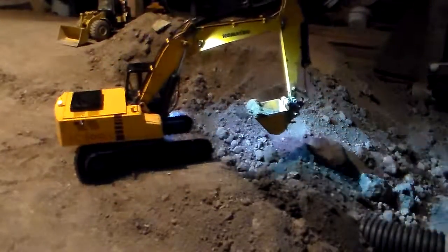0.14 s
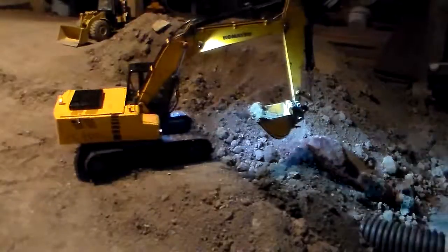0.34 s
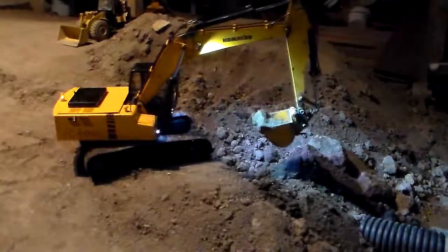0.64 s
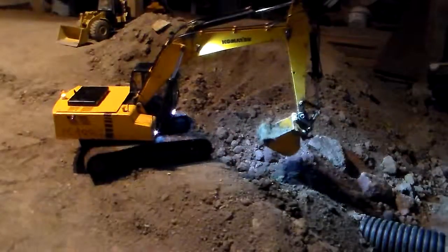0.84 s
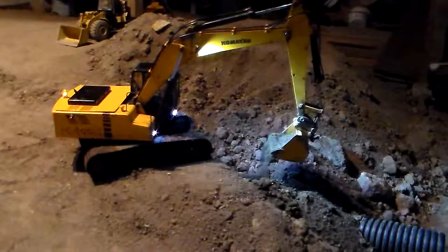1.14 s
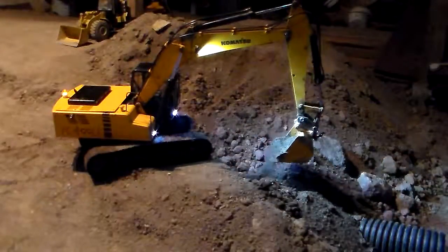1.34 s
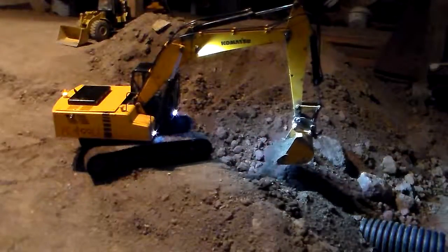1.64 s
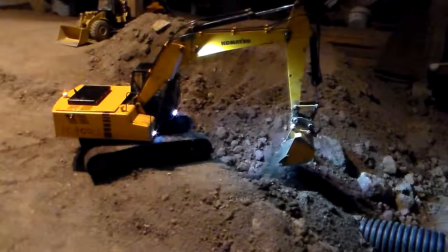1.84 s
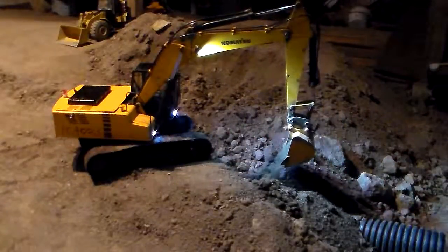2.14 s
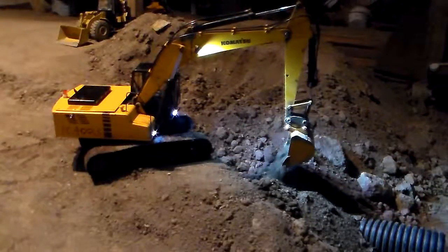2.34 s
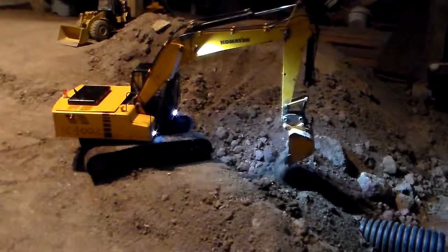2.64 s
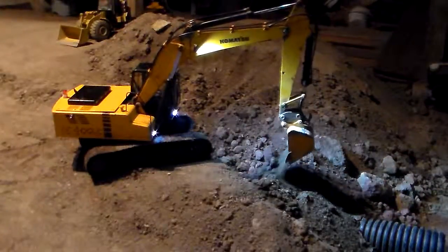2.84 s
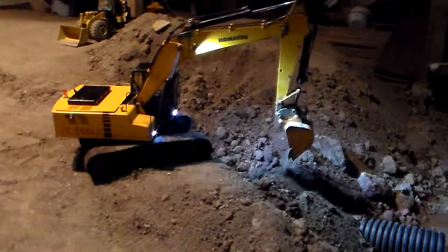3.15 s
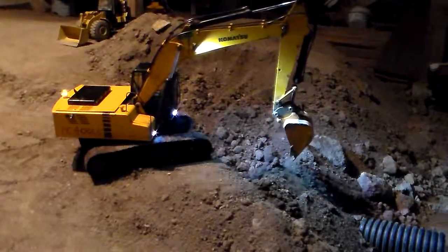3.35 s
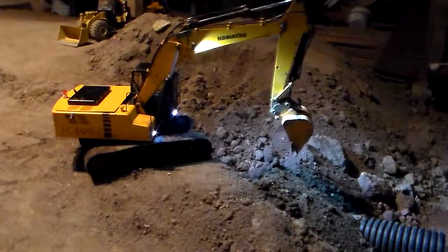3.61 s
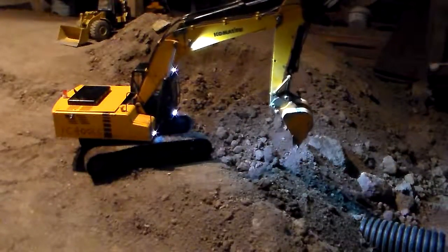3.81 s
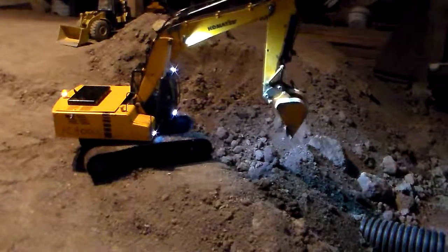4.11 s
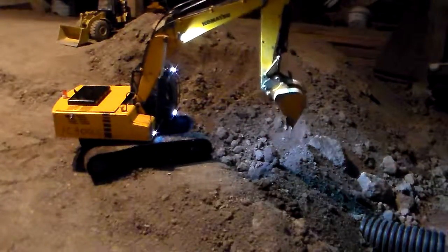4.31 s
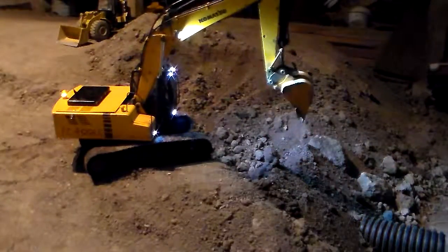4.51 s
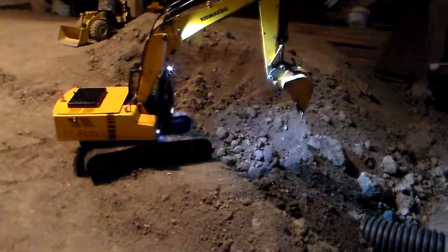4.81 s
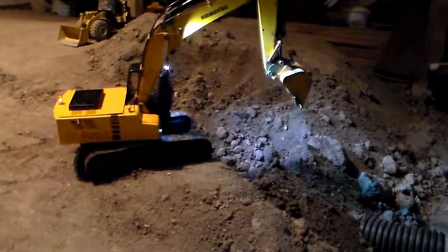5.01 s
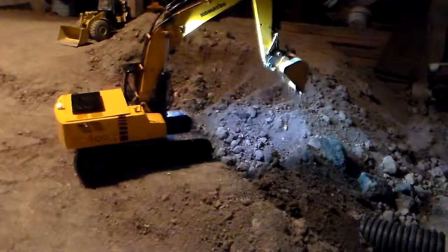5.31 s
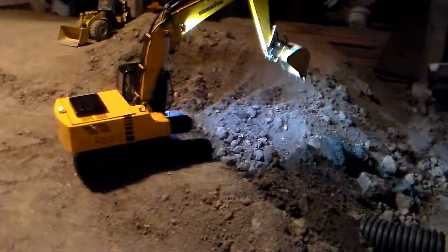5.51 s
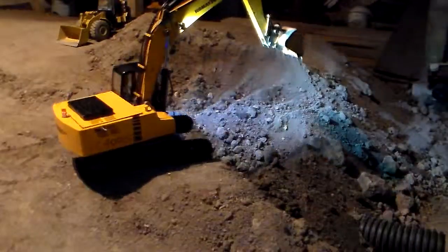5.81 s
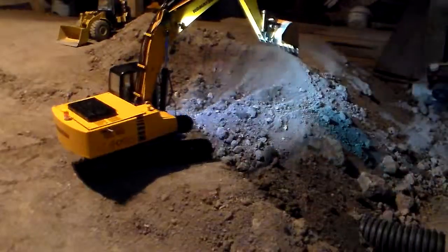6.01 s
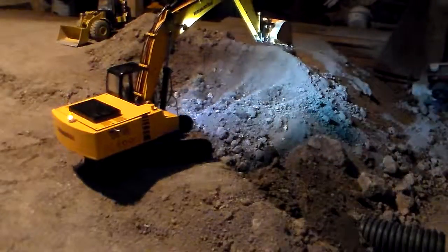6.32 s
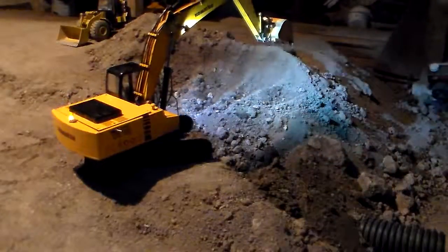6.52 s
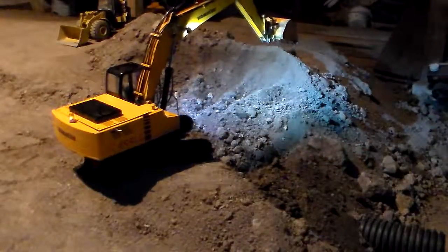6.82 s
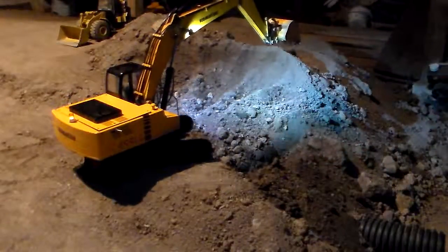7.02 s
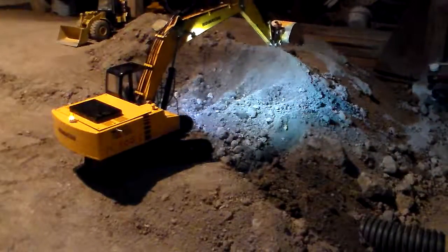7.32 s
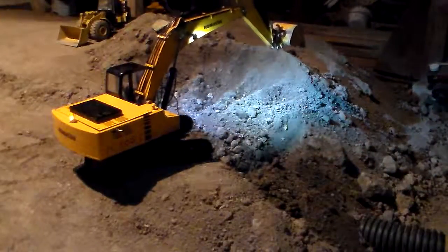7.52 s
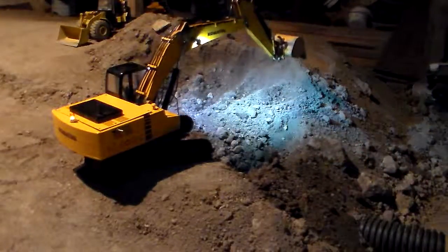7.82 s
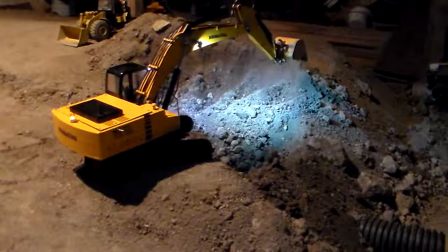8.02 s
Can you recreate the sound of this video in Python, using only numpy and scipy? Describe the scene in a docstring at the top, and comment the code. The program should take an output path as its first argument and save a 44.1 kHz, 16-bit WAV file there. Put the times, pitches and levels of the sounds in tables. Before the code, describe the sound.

The wavering whine of a miniature excavator's pump fills a quiet workshop, joined by short soil hisses and later a light rattle.

```python
"""A model digger's hydraulic gear pump, driven by a brushless motor, hums in a quiet workshop.
Its tones are orders (multiples) of the shaft speed, which hunts about each new load the valves set;
they and the rush of oil force the housing to resonate. The turning rotor modulates the speed
controller's chopping whine into side tones. The body swings twice, the second time turning a rattling
side to the listener. Behind are a tick, hisses like dry soil off the bucket, a low hum and room rumble."""
import sys
import numpy as np
from scipy import signal
from scipy.fft import rfft, irfft, next_fast_len
from scipy.io import wavfile
from scipy.ndimage import uniform_filter1d

SR = 44100
rng = np.random.default_rng(int(sys.argv[2]) if len(sys.argv) > 2 else 0)


def transcribe(signal):
    """Save signal, clipped to [-1, 1], as a 16-bit WAV file at the path in sys.argv[1]."""
    frames = np.atleast_2d(signal).T
    limited = np.clip(frames, -1, 1)
    pcm = np.round(limited * 32767).astype(np.int16)
    wavfile.write(sys.argv[1], SR, pcm)


N = 359415
CONTROL_HZ, CRUISE_HZ = 400, 54  # rate of the slow control curves; usual shaft speed
TIME, STEPS = np.arange(N) / SR, np.arange(3400) / CONTROL_HZ


# Neighbouring high orders that take turns at ringing the housing: order, relative_db
HIGH_ORDERS = [(46, -8), (47, 2), (48, -6.5), (49, 4), (50, -35), (51, 0)]
# Weaker pump tones: order, relative_db
WEAK_ORDERS = [(7, -24), (8.5, -22), (9, -19), (10, -16), (10.5, -11.5), (11, -11.5), (13, -15),
               (14.5, -13), (15.5, -8.5), (18, -7.5), (20, -6), (24.5, -5.5), (56, -13)]
def gear_pump(turns, load_hz, main_db, second_db, high_db, housing_db, turned):
    """Forced vibration: shaft orders swell near a housing resonance and sink between two."""
    steep = lambda hz: resonance(hz) ** 1.6
    ring = lambda x, window_s: steadied(filtered(x, steep), window_s)
    octave_db = -47 - 2.5 * (load_hz - CRUISE_HZ) + 3.5 * turned
    overspeed_db = -5 * np.maximum(load_hz - 55.8, 0)
    out = amp(main_db) * ring(shaft_tone(turns, order=21, flutter_db=2), window_s=1 * .76)
    out += amp(second_db) * ring(shaft_tone(turns, order=18.5, flutter_db=3), window_s=1)
    out += amp(octave_db) * ring(shaft_tone(turns, order=42, flutter_db=3.5), window_s=.18)
    high = sum(amp(db) * shaft_tone(turns, order, flutter_db=1) for order, db in HIGH_ORDERS)
    out += amp(high_db + overspeed_db) * ring(high, window_s=.23)
    low_db = 2.3 * (main_db + 27) - 62  # grows with the main tone
    out += amp(low_db) * shaft_tone(turns, order=5, flutter_db=2)
    weak = sum(amp(db + (3.5 if order > 16 else -1) * turned) * shaft_tone(turns, order, flutter_db=3)
               for order, db in WEAK_ORDERS)
    return out + amp(housing_db - 7) * filtered(weak, resonance)


def shaft_tone(turns, order, flutter_db):
    """Rotational harmonic: a multiple of shaft speed, wandering in level and left-right phase."""
    phase = 2 * np.pi * (order * turns + rng.random())
    lead = upsample(.0039 * order * drift(1.05))
    flutter = upsample(amp(flutter_db * drift(26.5)))
    return np.sqrt(2) * flutter * np.cos([phase + lead, phase - lead])


# Loads set by the valve moves: start_s, shaft_speed_hz
VALVE_MOVES = [(0.0, 51.0), (.2, 50.1), (.46, 51.3), (.78, 53.3), (.89, 51.2), (1.17, 53.8), (1.86, 51.8),
               (1.96, 54.4), (2.3, 53.5), (2.78, 54.2), (3.13, 55.3), (3.38, 53.5), (3.72, 52.1),
               (3.88, 54.8), (4.22, 56.2), (4.53, 54.0), (4.71, 50.4), (5.12, 51.2), (5.54, 53.8),
               (6.12, 55.6), (6.36, 54.5), (6.7, 55.9), (6.79, 53.6), (6.95, 55.7), (7.04, 54.5),
               (7.28, 55.0), (7.62, 57.1), (8.1, 55.8)]
def valve_load(settle_s=.06):
    """Step response: the shaft speed, in Hz, settles smoothly at each new load."""
    start_s, speed_hz = np.transpose(VALVE_MOVES)
    held_hz = speed_hz[np.searchsorted(start_s, STEPS, "right") - 1]
    smooth = lambda x: uniform_filter1d(x, round(settle_s * CONTROL_HZ / 2), mode="nearest")
    return upsample(smooth(smooth(held_hz)))


def shaft_turns(load_hz):
    """Frequency modulation: the speed hunts about its load; its integral is the count of turns."""
    hunt_band = signal.butter(1, (2.5, 8), "band", fs=CONTROL_HZ)
    hunting_hz = .45 * unit_rms(signal.lfilter(*hunt_band, rng.standard_normal(len(STEPS))))
    jitter_hz = .32 * drift(18)  # smears the high orders
    return np.cumsum(load_hz + upsample(hunting_hz + jitter_hz)) / SR


# Resonances of the housing: pitch_hz, bandwidth_hz, peak_db
HOUSING_MODES = [(468, 8.7, 14.5), (583.7, 29.5, 10.5), (720, 8.6, 12), (769.5, 12.5, 12), (951, 21, 3.5),
                 (1050, 12, 5.5), (1094, 18, 1), (1147.3, 51, 12.5), (1400, 42, -15), (1570, 370, 3.5),
                 (2080, 53, 5), (2510, 72, 11), (2582, 9, 19), (2694.5, 33, 13), (3100, 23, 0.5),
                 (4780, 42, 5.5), (6000, 57, -18)]
def resonance(hz):
    """Modal response: the housing's resonance peaks add in power over a flat gain of one."""
    peaks = sum(amp(db) ** 2 / (1 + (2 * (hz - pitch) / width) ** 2) for pitch, width, db in HOUSING_MODES)
    return np.sqrt(1 + peaks)


# Broad response of the housing: frequency_hz, density_db
HOUSING_SPECTRUM = [(220, -41), (400, -21.5), (560, -9), (650, -11), (764, -8), (889, -12), (1130, -3.5),
                    (1500, -5.5), (1800, -4.5), (1950, -10), (2900, -8.5), (4200, -14.5), (6100, -16),
                    (7000, -21.5), (9500, -19), (10300, -21), (14300, -27)]
def oil_and_gears(turns, housing_db):
    """Source and filter: the housing colours the throbbing oil rush and the buzz of the gears."""
    colour = lambda hz: spectrum(HOUSING_SPECTRUM)(hz) * resonance(hz) ** .85
    # the gears repeat every two turns, giving a comb of half orders
    cycle = irfft(np.exp(2j * np.pi * rng.random(1025)) * (np.arange(1025) < 260))
    comb = np.interp(turns / 2 % 1, np.arange(2048) / 2048, cycle)
    buzz = unit_rms(filtered(comb, colour))
    angle = 2 * np.pi * turns
    throb = 1 + .076 * np.cos(angle) + .16 * np.cos(angle / 2) + .12 * np.cos(2 * angle)
    rush = throb * noise(colour, DIGGER_COHERENCE, patchy_db=1.5)
    return amp(housing_db + 3) * rush + amp(housing_db - 2) * buzz


def top_tone(turns, load_hz):
    """Amplitude modulation: a fluttering high order grows louder with shaft speed."""
    return amp(-49 + 1.56 * (load_hz - CRUISE_HZ)) * shaft_tone(turns, order=49, flutter_db=5)


# Side tones of the chopping: offset_orders, level_db
SIDEBANDS = [(-35, -60), (-28, -65), (-17, -69), (-14, -66), (-9, -67), (-8, -54.5), (-7, -47.5), (-5, -53),
             (-4, -64), (-2, -65), (-1, -64), (0, -57), (2, -61), (3.5, -64), (4, -59), (5, -51),
             (6.5, -61), (7, -40.5), (8, -58), (9, -56), (11, -62), (13, -65), (14, -64), (28, -63)]
# Balance of the whine: frequency_hz, left_over_right_db
SIDEBAND_PAN = [(7500, -1), (7640, -3), (7750, -3), (8000, -1), (8280, 2), (8390, 4.5), (8500, 2)]
def controller_whine(turns, upper_db, lower_db, chop_hz=8016.6):
    """Sidebands: the rotor splits the fixed chopping pitch into tones spaced by shaft orders."""
    out = np.zeros((2, N))
    for order, db in SIDEBANDS:
        usual_hz = chop_hz + order * CRUISE_HZ
        phase = 2 * np.pi * (chop_hz * TIME + order * turns + rng.random())
        pan_db = lookup(SIDEBAND_PAN, usual_hz) + 1.7 * drift(.5)
        lead = upsample(lookup(PHASE_LEAD, usual_hz) + .9 * drift(.4))
        level_db = db + 2 * drift(7.7) + 1.8 * drift(1)
        swell = np.sqrt(2) * amp(1 + (upper_db if order > 0 else lower_db))
        out[0] += swell * upsample(amp(level_db + pan_db / 2)) * np.cos(phase + lead / 2)
        out[1] += swell * upsample(amp(level_db - pan_db / 2)) * np.cos(phase - lead / 2)
    return out


# Colour of the rattle: frequency_hz, density_db
RATTLE_SPECTRUM = [(900, -29), (1300, -6), (1650, 10), (1850, -20), (2200, -42), (5000, -28)]
def rattle(turns, turned):
    """Directivity: noise pulsing with the shaft is heard as its side turns to the listener."""
    bursts = np.exp(.6 * np.cos(2 * np.pi * turns) + 1.6 * np.cos(np.pi * turns))  # strong, then weak
    rush = noise(spectrum(RATTLE_SPECTRUM), DIGGER_COHERENCE, patchy_db=1.5)
    return amp(-42.5) * turned * unit_rms(bursts * rush)


# Swings of the body: start_s, end_s
BODY_SWINGS = [(-.25, 0.86), (4.68, 6.05)]
# Colour of the swing drive: frequency_hz, density_db
SWING_SPECTRUM = [(600, -28), (1300, -10), (1750, 5), (2100, 0), (2800, -17), (3500, -5), (4500, -23),
                  (9000, -12), (14000, -37)]
def swing_drive(ease_s=.22):
    """Broadband machine noise: the drive adds a rough rush while it swings the body."""
    running = sum(trapezoid(start, end, ease_s) for start, end in BODY_SWINGS)
    return amp(-39.5) * running * noise(spectrum(SWING_SPECTRUM), DIGGER_COHERENCE, patchy_db=.5)


# Gusts of hiss: start_s, end_s, level_db, whistle_hz
SOIL_SLIDES = [(3.88, 4.02, -45, 6000), (4.2, 4.348, -44.5, 6080), (4.36, 4.562, -41.5, 5960),
               (4.625, 4.8, -41, 5250), (4.88, 4.984, -46.5, 5570), (4.997, 5.153, -42, 5630)]
# Colour of the hiss: frequency_hz, density_db
SOIL_SPECTRUM = [(2500, -13), (4000, -2), (6000, 3), (7200, -1), (9200, 1), (10500, -8), (14300, -9)]
def soil_hiss():
    """Friction noise, as of dry soil sliding off the bucket, with a fuzzy, rising narrowband whistle."""
    gusts, whistles = np.zeros((2, N))
    for start, end, db, hz in SOIL_SLIDES:
        gust = amp(db) * trapezoid(start, end, ease_s=.0067)
        age_s = TIME - start
        phase = 2 * np.pi * hz * age_s * (1 + .17 * age_s)
        gusts += gust
        whistles += gust * (upsample(drift(110)) * np.cos(phase) + upsample(drift(110)) * np.sin(phase))
    return gusts * noise(spectrum(SOIL_SPECTRUM), DIGGER_COHERENCE, patchy_db=3.5) + amp(-10.5) * whistles


# Blow on something small and hard: start_s, level_db
BLOWS = [(1.69, -12)]
# Modes of the struck object: pitch_hz, relative_db, t60_s
STRUCK_MODES = [(3260, 8, 0.0034), (6800, -7, .004), (10700, -14, 0.0068), (4480, -19, 0.012),
                (13300, -20, 0.0033)]
def tick():
    """Free vibration: the modes of a small hard object decay after a blow, with one echo."""
    out, t = np.zeros(N), np.arange(600) / SR
    ring = sum(amp(db - 60 * t / t60) * np.sin(2 * np.pi * hz * t) for hz, db, t60 in STRUCK_MODES)
    ring *= np.tanh(t / .0004)  # quick attack
    for start_s, db in BLOWS:
        for delay_s, path_db in ((0, -1), (.0107, -9)):
            at = round((start_s + delay_s) * SR)
            out[at:at + len(t)] += amp(db + path_db) * ring / abs(ring).max()
    return out


# Rumble of the room: frequency_hz, density_db
ROOM_SPECTRUM = [(12, -30), (20, -2.5), (48, -2), (97, -10), (201, -14.5), (297, -14.5), (405, -13),
                 (450, -17.5), (580, -46), (990, -120)]
# Left-right likeness of the rumble: frequency_hz, coherence
ROOM_COHERENCE = [(30, 1), (60, 0.38), (125, 0.49), (250, 0.24), (450, 0.77)]
def workshop(hum_hz=30.0, hum_db=-54):
    """Ambient noise floor: a low hum over the partly coherent rumble of the room."""
    hum = np.sqrt(2) * amp(hum_db + upsample(.74 * drift(4.1))) * np.cos(2 * np.pi * hum_hz * TIME)
    return hum + amp(-52.5) * noise(spectrum(ROOM_SPECTRUM), ROOM_COHERENCE, patchy_db=1.5)


# Left-right likeness of the digger's noises: frequency_hz, coherence
DIGGER_COHERENCE = [(400, 0.94), (1000, 1), (2500, 0.98), (4000, 0.85), (8000, 0.32), (13000, 0.8)]
# Balance of all the noises: frequency_hz, left_over_right_db
NOISE_PAN = [(400, 0), (900, -5), (2300, 3.5), (4200, -3), (14200, 1)]
# Phase difference of the noises and the whine: frequency_hz, left_lead_rad
PHASE_LEAD = [(3500, 0), (6200, .6), (7240, .9), (7600, -.7), (7800, 1.4), (8390, .5), (11000, 0)]
def noise(colour, coherence, patchy_db):
    """Partial coherence: two channels share part of a random spectrum with drifting patches of level."""
    frames, hz = N // 512 + 5, np.fft.rfftfreq(2048, 1 / SR)
    real, imag, other_real, other_imag, patches = rng.standard_normal((frames, 1025, 5)).T
    patches = unit_rms(uniform_filter1d(uniform_filter1d(patches, size=12, axis=0), size=8, axis=1))
    shared = lookup(coherence, hz)[:, None]
    left = real + 1j * imag
    right = shared * left + np.sqrt(1 - shared ** 2) * (other_real + 1j * other_imag)
    tilt = (amp(lookup(NOISE_PAN, hz) / 2) * np.exp(.5j * lookup(PHASE_LEAD, hz)))[:, None]
    spectra = np.array([left * tilt, right / tilt]) * colour(hz)[:, None] * amp(patchy_db * patches)
    return unit_rms(signal.istft(spectra, nperseg=2048, noverlap=1536)[1][:, :N])


def drift(rate_hz):
    """Low-pass noise: a random control curve of rms 1, changing at up to about rate_hz."""
    lowpass = signal.butter(2, rate_hz, fs=CONTROL_HZ)
    return unit_rms(signal.lfilter(*lowpass, rng.standard_normal(len(STEPS))))


def filtered(x, gain):
    """Linear filtering: the spectrum is multiplied by gain(hz)."""
    size = next_fast_len(N)
    return irfft(rfft(x, size) * gain(np.fft.rfftfreq(size, 1 / SR)), size)[..., :N]


def steadied(x, window_s):
    """Running normalisation: level changes slower than window_s are divided out."""
    return x / np.sqrt(uniform_filter1d((x ** 2).mean(0), size=round(window_s * SR)))


def lookup(points, hz):
    """Interpolation along a logarithmic frequency axis."""
    knots_hz, values = np.transpose(points)
    return np.interp(np.log(hz + 1), np.log(knots_hz + 1), values)


def spectrum(points):
    return lambda hz: amp(lookup(points, hz))


def trapezoid(start_s, end_s, ease_s):
    return np.clip(np.minimum(TIME - start_s, end_s - TIME) / ease_s, 0, 1)


def upsample(x):
    return np.interp(TIME, STEPS, x)


def unit_rms(x):
    return x / np.sqrt(np.mean(x ** 2) + 1e-20)


def amp(db):
    return 10 ** (np.asarray(db) / 20)


# Course of the strongest tones: time_s, main_db, second_db, high_orders_db, upper_whine_db
TONE_LEVELS = [(0.0, -34.5, -38, -53, -4), (.68, -31.5, -37.5, -42, -2.5), (.78, -38, -39, -35, -7),
               (1.12, -35, -38, -41, 2.5), (1.22, -31.5, -39, -35.5, 2.5), (1.9, -33, -37.5, -36.5, 1),
               (2.3, -32.5, -38.5, -37, -0.5), (3.3, -32, -41, -34, 0.5), (3.8, -33, -38, -33.5, 4),
               (4.3, -36.5, -38.5, -38, -2.5), (4.62, -37, -36, -40.5, 0.5), (4.8, -34.5, -40.5, -39.5, 3),
               (5.15, -34, -41, -43, -1.5), (5.5, -29, -43, -55, -4.5), (5.62, -30.5, -48, -38, -3),
               (6.05, -27, -39, -35.5, -5), (6.4, -32, -39.5, -36, -3), (6.9, -28, -42.5, -35, -3),
               (7.55, -30, -42, -31.5, 0.5), (7.72, -31, -34.5, -45, -6.5), (8.15, -31.5, -32.5, -35, 0)]
def scene():
    """Superposition: pump, whine and rattle follow one shaft and add to the other sounds."""
    time_s, *levels = np.transpose(TONE_LEVELS)
    main_db, second_db, high_db, upper_db = (np.interp(TIME, time_s, db) for db in levels)
    turned = np.interp(TIME, (5.25, 6.25), (0, 1))  # the body turns its other side to the listener
    housing_db = -37.5 - .46 * turned
    load_hz = valve_load()
    turns = shaft_turns(load_hz)
    return (gear_pump(turns, load_hz, main_db, second_db, high_db, housing_db, turned)
            + oil_and_gears(turns, housing_db)
            + controller_whine(turns, upper_db, lower_db=-1.5 * turned)
            + top_tone(turns, load_hz) + rattle(turns, turned)
            + swing_drive() + soil_hiss() + tick() + workshop())


def record(dry, recovery_db_per_s=4.5, edge_hz=14200):
    """Automatic gain control: a sharp peak steps the gain down and it creeps back; then a band limit."""
    sharp = abs(signal.lfilter(*signal.butter(2, [2900, 4200], "band", fs=SR), dry.mean(0)))
    creep_db = TIME * recovery_db_per_s
    trigger_db = 3.5 * (sharp > .09)
    cut_db = np.maximum.accumulate(trigger_db + creep_db) - creep_db
    held = dry / amp(uniform_filter1d(cut_db, size=200, origin=99))
    lowpass = signal.firwin(1023, edge_hz, window=("kaiser", 10), fs=SR)
    return signal.oaconvolve(held, lowpass[None], "same")


dry = scene()
out = record(dry)
transcribe(out)
```